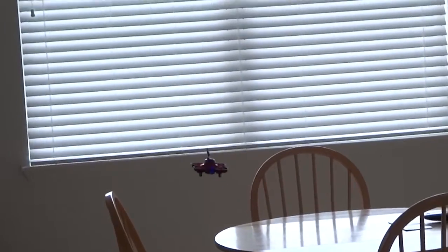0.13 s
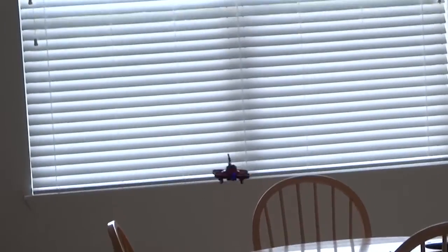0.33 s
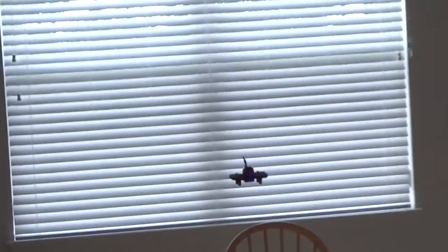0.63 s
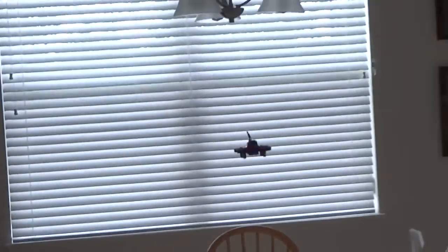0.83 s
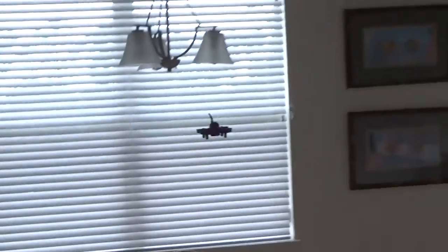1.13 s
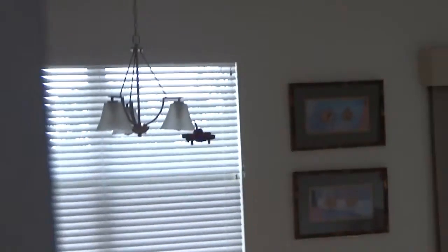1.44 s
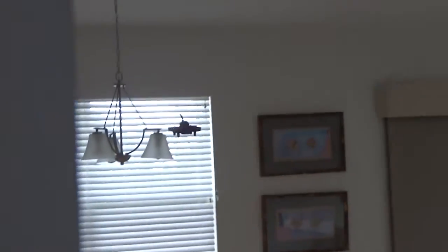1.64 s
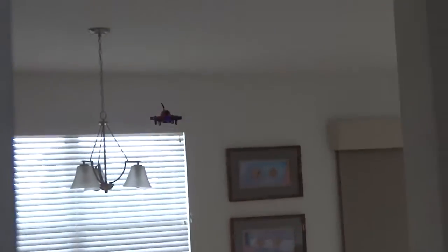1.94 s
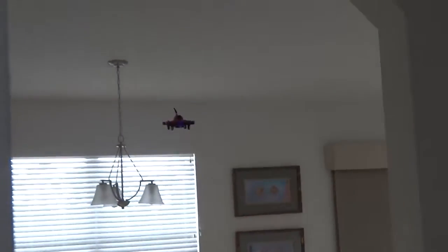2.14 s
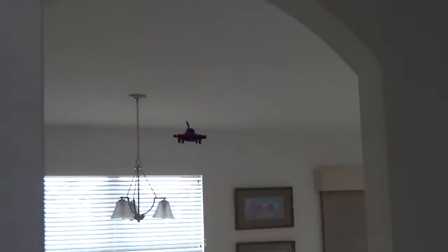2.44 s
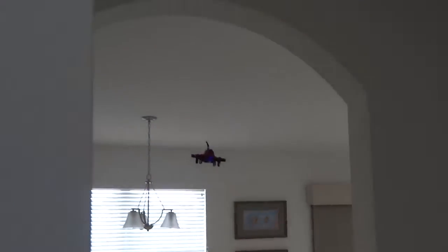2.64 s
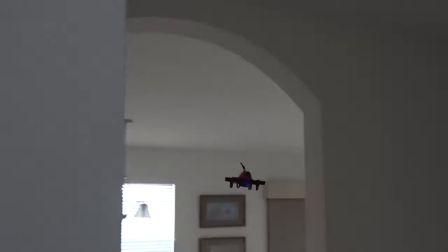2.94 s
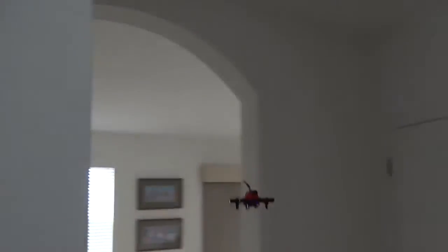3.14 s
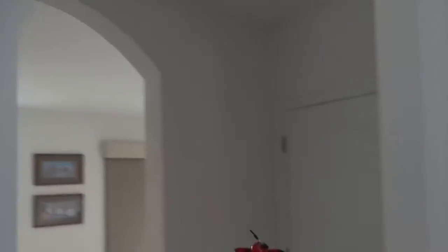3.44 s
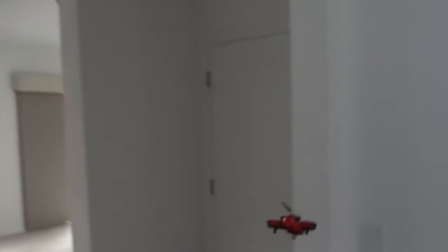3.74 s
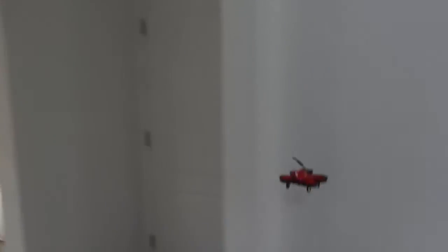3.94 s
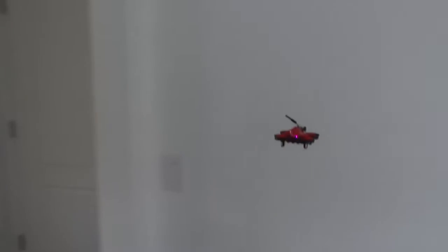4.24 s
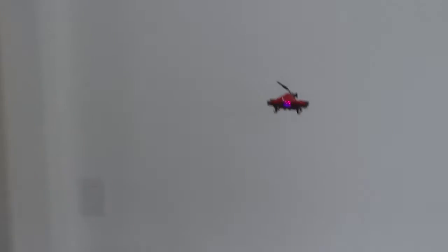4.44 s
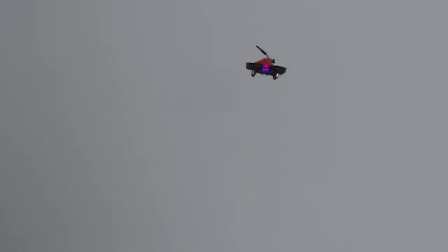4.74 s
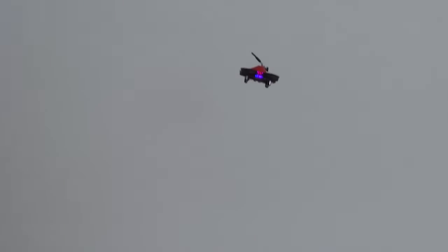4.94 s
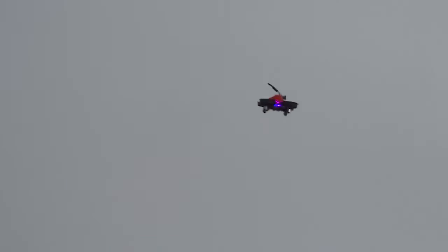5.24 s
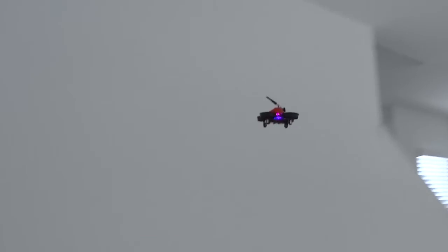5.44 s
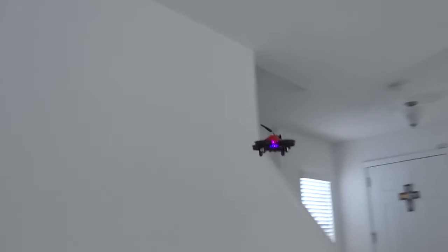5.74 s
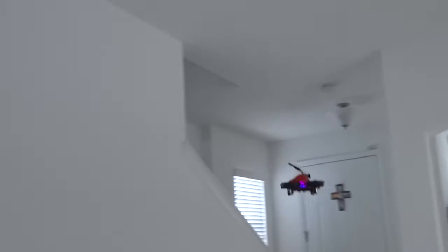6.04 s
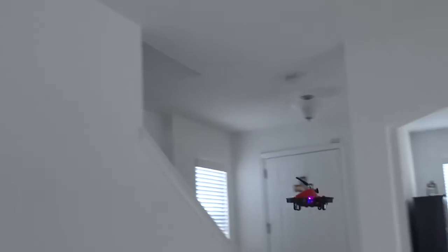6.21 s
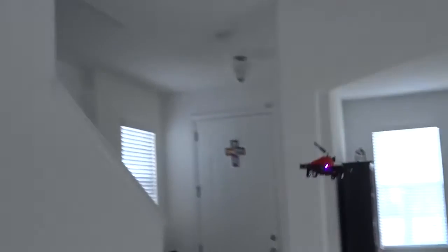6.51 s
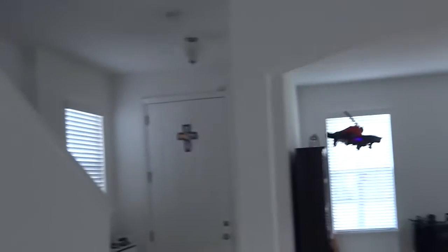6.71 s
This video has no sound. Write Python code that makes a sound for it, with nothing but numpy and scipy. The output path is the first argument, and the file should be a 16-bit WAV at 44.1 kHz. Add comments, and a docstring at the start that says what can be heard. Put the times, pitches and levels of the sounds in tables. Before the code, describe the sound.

Steady insect-like whine of a miniature quadcopter indoors, rough and beating, wrapped in bright rushing air. It begins moderately distant, with small plastic snaps, slowly drops in pitch, then surges higher and louder past the halfway point. After easing down it revs up again and holds to the cut. A faint needle-like whistle persists above; soft shoe scuffs and quiet house air are almost buried. Stereo microphone, short room reflections, little bass.

```python
"""Small ducted-fan quadcopter in a living room

Four four-bladed rotors whine at slightly different speeds: sines at multiples of each shaft speed.
They chop the inflow into rasp and hiss: noise around blade overtones and noise pulsed at the blade pass.
The motor drive sings near 10 kHz as two wavering sines; changing wall reflections make the tones flutter.
Soft footsteps (enveloped noise), three small plastic clicks (ringing modes) and faint house air lie under it."""
import sys
import numpy as np
from scipy import signal
from scipy.fft import rfft, irfft, next_fast_len
from scipy.io import wavfile

SR = 44100
rng = np.random.default_rng(int(sys.argv[2]) if len(sys.argv) > 2 else 0)


def waveform_to_disk(signal):
    """Save audio, clipped to [-1, 1], as 16-bit WAV at the path in sys.argv[1]."""
    frames = np.transpose(np.atleast_2d(signal))
    scaled = np.clip(frames, -1, 1) * 32767
    samples = np.round(scaled).astype(np.int16)
    wavfile.write(sys.argv[1], SR, samples)


N = 302967
T_S = np.arange(N) / SR
ROOM_T60_S = 0.38
TOP_HZ = 15750

# quiet air of the house: (frequency [Hz], density [dB per Hz])
HOUSE_SPECTRUM = [(20, -1), (60, -1), (100, -1), (160, 5.5), (260, 11.5), (600, 4), (2000, -15)]
# plastic clicks: (time [s], peak level [dB])
CLICK_EVENTS = [(.3655, -20), (.5203, -27), (.5338, -11.5)]
# modes of the plastic: (frequency [Hz], relative level [dB], t60 [s])
PLASTIC_MODES = [(1080, -8, 0.036), (1793, -17, .009), (2570, 10, .005), (3020, 13, 0.0056),
                 (4600, -16, 0.0027), (7900, -14, .003)]
# footsteps: (time [s], relative level [dB], decay to 1/e [s])
STEP_EVENTS = [(1.02, -54, 0.18), (1.974, -42, 0.055), (2.583, -56.5, 0.037), (3.56, -49.5, 0.24),
               (4.219, -39, 0.12), (5.502, -40, 0.21), (5.612, -46.5, 0.065)]
# scuff of a sole: (frequency [Hz], density [dB per Hz])
SOLE_SPECTRUM = [(80, -57), (200, -8), (400, 1.5), (700, 7.5), (1300, 5.5), (2500, 2), (6000, -33)]
# first voice of the drive whistle, Doppler-shifted by the flight: (time [s], pitch [Hz])
DRIVE_PITCH = [(0, 10046), (.6, 10040), (1.1, 10027), (1.6, 10036), (2.2, 10046), (2.9, 10049),
               (3.3, 10030), (4.5, 10015), (5.2, 10023), (6.87, 10018)]
# whistle strength: (time [s], level [dB])
DRIVE_LEVEL = [(0, -40.5), (.8, -38), (1.6, -42.5), (2.2, -37), (2.9, -37.5), (3.4, -47), (4, -32.5),
               (4.6, -40), (5.2, -35), (5.9, -37.5), (6.4, -36.5), (6.87, -30)]
# air rushing through the ducts: (frequency [Hz], density [dB per Hz])
HISS_SPECTRUM = [(70, -45), (200, -39), (350, -26), (600, -15.5), (1100, -14.5), (1500, -9.5), (2400, -7.5),
                 (4200, -4.5), (5100, -3), (5900, -3.5), (10400, 3.5), (11700, 1.5), (14100, 1),
                 (15700, -11.5)]
# rotors, fastest to slowest: (blade tone [dB], shaft hum [dB])
ROTOR_LEVELS = [(-3.5, -14), (-2.5, -5.5), (-11.5, -7), (-10, -9)]
# shaft-speed multiples: every fourth is a blade overtone, the others come from uneven blades: [order]
SHAFT_ORDERS = [3, 5, 6, 7, 8, 9, 11, 12, 16, 20]
# one row per order, rotors fastest to slowest: (level [dB], level [dB], level [dB], level [dB])
ORDER_LEVELS = [(-34, -28, -33.5, -35), (-25, -23.5, -27, -16), (-18.5, -26, -46, -49),
                (-16, -11, -16, -24), (-10.5, -15, -9, -11), (-22, -18.5, -24, -30), (-32, -18, -28, -40),
                (-17.5, -10, -23, -15), (-23, -15.5, -18, -15.5), (-36, -20, -26, -20)]
# pilot's throttle and steering, before yaw and trim:
# (time [s], mean shaft speed [Hz], first diagonal pair's gap [Hz], second pair's gap [Hz])
FLIGHT = [(0, 426.7, 45.34, 8), (.4, 439, 47.7, 27), (.65, 433.2, 38.99, 26), (1.3, 422.2, 41, 21.1),
          (1.6, 422.8, 41, 26), (1.82, 413.3, 45.1, 19.3), (2.3, 408.2, 50.12, 29),
          (2.9, 406.8, 66.08, 30.8), (3.37, 414.3, 64, 33), (3.47, 439, 64.7, 34.2),
          (3.72, 439.4, 58.05, 19.6), (4.03, 452, 49, 22.4), (4.43, 451.3, 39.11, 12.4),
          (4.68, 424.5, 45.04, 10.3), (5.18, 403, 45.96, 14), (5.6, 407.4, 55.93, 17.4),
          (6.04, 408.8, 47.05, 10.5), (6.22, 437.4, 34.12, 19.6), (6.4, 445, 52.07, 8.1),
          (6.62, 444.8, 28, 10.9), (6.87, 447, 52, 10.5)]
# loudness as the drone comes near and passes close to a wall: (time [s], level [dB])
NEAR_LEVEL = [(0.0, -36.5), (0.44, -38), (1.24, -38), (1.68, -39.5), (2.28, -34.5), (3.1, -33), (3.62, -28),
              (4.04, -28), (4.84, -32), (5.64, -30.5), (5.95, -30), (6.14, -28.5), (6.47, -28.5),
              (6.87, -30.5)]
# shaft hum, heard once the drone is close: (time [s], level [dB re nearness, before HUM_TRIM_DB])
HUM_LEVEL = [(0, -32), (3.3, -33), (4.2, -25), (6.87, -22.5)]
# blade tone swells where direct sound and reflections add up: (middle [s], half length [s], gain [dB])
SWELL_EVENTS = [(3.206, 0.069, 6.5), (3.889, 0.055, 4), (4.205, 0.043, 5.5), (6.197, 0.012, 6)]
# tip of the rotor discs towards the listener: (time [s], tip [about -1 edge-on to 1 face-on])
DISC_TIP = [(0, 0.26), (.4, -1.1), (.9, 0.78), (1.5, 0.34), (2.1, 0.43), (3.0, -0.69), (3.6, -0.73),
            (4.0, -0.12), (4.35, .2), (4.75, 0.99), (5.35, -0.031), (6.1, .1), (6.5, 0.79), (6.87, 0.31)]

# levels at hover speed, relative to nearness
HOVER_HZ = 430
TONE_DB, OVERTONE_DB, RASP_DB, HISS_DB = -5, -3, -7.5, 3
LOW_HISS_DB = 1.5  # lower part of the hiss, relative to the rest
# gain exponents on shaft speed: throttle favours the blade tone and brightens the hiss
TONE_POWER, BUZZ_POWER, LOW_HISS_POWER = 4, -1, -0.96
# face-on the blade tone carries and the lower hiss thins: dB per unit of tip
FACING_TONE_DB, FACING_HISS_DB = 2.8, -0.5
HUM_TRIM_DB = -1.5
TONES_PAN_DB = -.5  # left minus right
YAW_HZ = 2.3  # first pair slowed and second pair sped up by this, to hold the heading
# the hardest-working rotor shakes: level at hover speed, exponent on shaft speed
SHAKE_DB, SHAKE_POWER = -18.5, 10


def undb(db):
    """Decibels to gain."""
    return 10 ** (np.asarray(db) / 20)


def unit(x):
    """Scale to rms 1."""
    return x / np.sqrt(np.mean(x ** 2))


def curves(table):
    """Each column of a table as a signal, rows joined by straight lines."""
    time_s, *columns = np.transpose(table)
    return [np.interp(T_S, time_s, column) for column in columns]


def noise(spectrum):
    """Noise with a (Hz, dB) spectrum, interpolated on log frequency, rms 1."""
    hz, db = np.transpose(spectrum)
    size = next_fast_len(N)
    bin_hz = np.maximum(np.fft.rfftfreq(size, 1 / SR), 1)
    gain = undb(np.interp(np.log(bin_hz), np.log(hz), db))
    return unit(irfft(rfft(rng.standard_normal(size)) * gain, size)[:N])


def walk(rate_hz):
    """Smooth chance with about `rate_hz` new values a second, rms 1."""
    knots = signal.resample_poly(rng.standard_normal(8192), 4, 1)
    return unit(np.interp(T_S * rate_hz * 4, np.arange(len(knots)), knots))


def lowpass(x, hz, order=2):
    """Butterworth low-pass."""
    return signal.sosfilt(signal.butter(order, min(hz, .45 * SR), fs=SR, output="sos"), x)


def highpass(x, hz, order=2):
    """Butterworth high-pass."""
    return signal.sosfilt(signal.butter(order, hz, "high", fs=SR, output="sos"), x)


def room(x, wet_db, side_db, t60_s, side_hz=7500, hop=2048):
    """Direct sound plus a dense tail whose pattern changes as source and listener move; mid/side stereo."""
    t_s = T_S[:SR // 2]
    tail = np.exp(-np.log(1000) * t_s / t60_s) * (t_s > .003)
    tail = tail / np.sqrt(np.sum(tail ** 2))
    fade = signal.windows.cosine(2 * hop)
    padded = np.pad(x, (hop, 2 * hop))
    echoes = np.zeros((2, len(padded) + len(t_s)))
    # a new set of reflections for each overlapping stretch
    for i in range(0, N + hop, hop):
        stretch = padded[i:i + 2 * hop] * fade
        reflections = rng.standard_normal((2, len(t_s))) * tail
        part = signal.fftconvolve([stretch], reflections, axes=1)
        echoes[:, i:i + part.shape[1]] += part
    mid, side = echoes[:, hop:hop + N]
    side = undb(side_db) * lowpass(side, side_hz) * np.array([[1], [-1]])
    return (x + undb(wet_db) * (mid + side)) / np.hypot(1, undb(wet_db))


def house(level_db=-67.5, side_db=-10):
    """Faint low air noise: a common part and a weaker opposed part in the two channels."""
    mid = noise(HOUSE_SPECTRUM)
    side = noise(HOUSE_SPECTRUM) * np.array([[1], [-1]])
    return undb(level_db) * (mid + undb(side_db) * side)


def clicks(radiate_hz=750):
    """Short snaps ring a few quickly dying modes; so small a part radiates little bass."""
    t_s = T_S[:SR // 10]
    ring = np.zeros(len(t_s))
    for hz, db, t60_s in PLASTIC_MODES:
        ring += undb(db) * np.sin(2 * np.pi * hz * t_s) * np.exp(-np.log(1000) * t_s / t60_s)
    ring = highpass(ring, radiate_hz, order=4)
    ring = ring / np.abs(ring).max()
    snaps = np.zeros(N)
    for time_s, db in CLICK_EVENTS:
        snaps[int(time_s * SR)] = undb(db)
    return room(signal.fftconvolve(snaps, ring)[:N], wet_db=-15, side_db=5, t60_s=ROOM_T60_S)


def footsteps(rise_s=0.0016, grain_db=3, heel_db=0, heel_s=0.0095):
    """Each heel lands with a short tap, then the sole scuffs to rest in uneven rubs."""
    push = np.zeros(N)
    for time_s, db, decay_s in STEP_EVENTS:
        age_s = np.maximum(T_S - time_s, 0)
        rise = 1 - np.exp(-age_s / rise_s)
        scuff = np.exp(-age_s / decay_s)
        tap = undb(heel_db) * np.exp(-age_s / heel_s)
        push += undb(db) * rise * (scuff + tap)
    rubs = noise(SOLE_SPECTRUM) * undb(grain_db * walk(120))
    return room(push * rubs, wet_db=-8.0, side_db=-6, t60_s=ROOM_T60_S)


def drive(waver_hz=4, second_db=-11, apart_hz=-40, flutter_db=3.0, flutter_rate_hz=80):
    """Motor windings sing at the switching rate; two voices a little apart beat."""
    (pitch_hz,), (level_db,) = curves(DRIVE_PITCH), curves(DRIVE_LEVEL)

    def voice(offset_hz):
        """Sine at the wavering, offset drive pitch."""
        return np.sin(2 * np.pi * np.cumsum(pitch_hz + offset_hz + waver_hz * walk(24)) / SR)

    voices = voice(0) + undb(second_db) * voice(apart_hz)
    whistle = unit(voices * undb(flutter_db * walk(flutter_rate_hz))) * undb(level_db)
    # soft furnishings swallow most of so high a tone
    return room(whistle, wet_db=-11.5, side_db=-6, t60_s=ROOM_T60_S, side_hz=9500)


def air(angles, low_db, chop=0.077, flicker_db=0.45):
    """Duct hiss, pulsing at each blade pass; `low_db` sets its lower part."""
    hiss = noise(HISS_SPECTRUM)
    # forward then backward, so the phase shifts largely cancel
    low = lowpass(lowpass(hiss, 8000)[::-1], 5700)[::-1]
    pulsing = 1 + chop * sum(np.cos(4 * angle) for angle in angles) / 2
    return unit(pulsing * undb(flicker_db * walk(30))) * (hiss + (undb(low_db) - 1) * low)


def shake(angle, effort_db, rough=0.76, rough_rate_hz=200):
    """A rough side tone one shaft turn above the blade tone, growing steeply with throttle."""
    side_tone = (1 + rough * walk(rough_rate_hz)) * np.sin(5 * angle)
    return undb(SHAKE_DB + SHAKE_POWER * effort_db) * unit(side_tone)


def blade_swell_db(wander_db=0.3, wander_rate_hz=6):
    """Slow wander of the blade tone plus brief swells along the flight path, in dB."""
    swells_db = sum(db * np.exp(-((T_S - mid_s) / half_s) ** 4) for mid_s, half_s, db in SWELL_EVENTS)
    return wander_db * walk(wander_rate_hz) + swells_db


def rotor_speeds(speed_hz, first_gap_hz, second_gap_hz, trim_hz=1.2, trim_rate_hz=4):
    """Throttle and steering mixed into four shaft speeds, fastest to slowest, each trimmed on its own."""
    offsets_hz = [first_gap_hz / 2 - YAW_HZ, second_gap_hz / 2 + YAW_HZ,
                  -second_gap_hz / 2 + YAW_HZ, -first_gap_hz / 2 - YAW_HZ]
    return [speed_hz + offset_hz + trim_hz * walk(trim_rate_hz) for offset_hz in offsets_hz]


def rotor(shaft_hz, order_db, wobble=0.002988, wobble_rate_hz=30, flutter_db=3.0, flutter_rate_hz=75,
          eddy_rate_hz=230, skirt_db=-4):
    """One fan: blade tone, its other orders, shaft hum, the rasp of chopped eddies, and its angle."""
    # the flight controller keeps trimming the speed
    angle = 2 * np.pi * np.cumsum(shaft_hz * (1 + wobble * walk(wobble_rate_hz))) / SR

    def tone(order):
        """Sine at one multiple of the shaft speed, rms 1."""
        return np.sqrt(2) * np.sin(order * angle + rng.uniform(0, 2 * np.pi))

    def eddies(order):
        """Narrow noise around one multiple of the shaft speed."""
        return walk(eddy_rate_hz) * np.sin(order * angle) + walk(eddy_rate_hz) * np.cos(order * angle)

    # gusty inflow keeps changing the load on the blades
    load = unit(undb(flutter_db * walk(flutter_rate_hz)))
    overtones = sum(undb(db) * tone(order) for order, db in zip(SHAFT_ORDERS, order_db))
    # eddies last a few blade passes, so they smear the orders that the duct favours
    rasp = undb(skirt_db) * eddies(7) + eddies(8)
    return load * tone(4), load * overtones, tone(1), rasp, angle


def drone():
    """Four rotors beating against each other, and their hiss, in the room."""
    speed_hz, *gaps_hz = curves(FLIGHT)
    (near_db,), (facing,), (hum_db,) = curves(NEAR_LEVEL), curves(DISC_TIP), curves(HUM_LEVEL)
    near = undb(near_db)
    effort_db = 20 * np.log10(speed_hz / HOVER_HZ)
    speeds_hz = rotor_speeds(speed_hz, *gaps_hz)
    fans = [rotor(hz, db) for hz, db in zip(speeds_hz, np.transpose(ORDER_LEVELS))]
    blades, overtones, hums, rasps, angles = map(np.array, zip(*fans))
    blade_gain, hum_gain = undb(ROTOR_LEVELS).T

    whine_db = TONE_DB + TONE_POWER * effort_db + FACING_TONE_DB * facing + blade_swell_db()
    whine = undb(whine_db) * (blade_gain @ blades)
    buzz = undb(OVERTONE_DB) * sum(overtones) + undb(RASP_DB) * unit(sum(rasps))
    buzz = undb(BUZZ_POWER * effort_db) * buzz
    tones = near * (whine + buzz + shake(angles[0], effort_db))
    tones = room(tones, wet_db=0.0, side_db=-15.5, t60_s=ROOM_T60_S, side_hz=9600)
    tones = tones * undb(TONES_PAN_DB * np.array([[.5], [-.5]]))

    low_hiss_db = LOW_HISS_DB + LOW_HISS_POWER * effort_db + FACING_HISS_DB * facing
    hiss = near * undb(HISS_DB) * air(angles, low_hiss_db)
    rush = room(hiss, wet_db=-8.5, side_db=-4.5, t60_s=ROOM_T60_S, side_hz=5800)
    hum = near * undb(hum_db + HUM_TRIM_DB) * (hum_gain @ hums)
    return tones + rush + hum


def scene():
    """The drone and its drive whistle over the small sounds of the house."""
    return house() + clicks() + footsteps() + drive() + drone()


def record(dry, low_cut_hz=55):
    """A gentle high-pass thins the bass; a steep elliptic low-pass cuts the top."""
    x = highpass(dry, low_cut_hz, order=1)
    return signal.sosfilt(signal.ellip(12, .1, 80, TOP_HZ, fs=SR, output="sos"), x)


dry = scene()
out = record(dry)
waveform_to_disk(out)
```